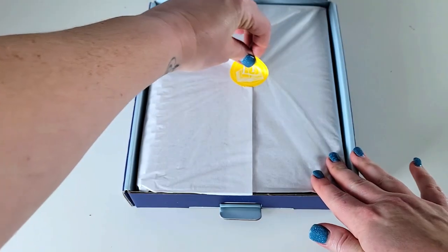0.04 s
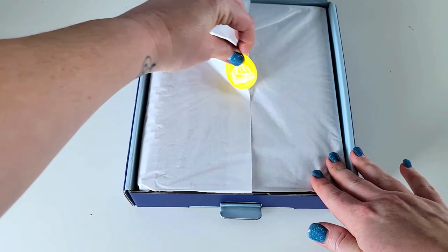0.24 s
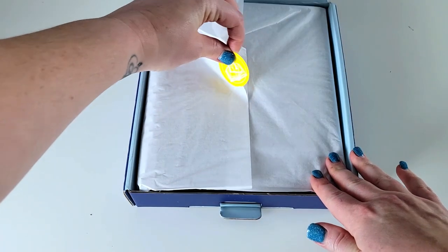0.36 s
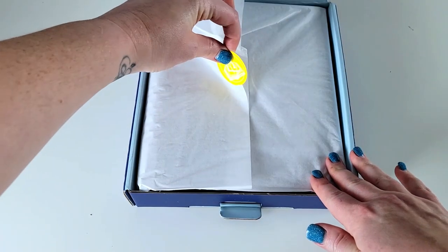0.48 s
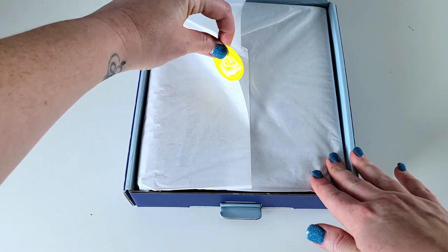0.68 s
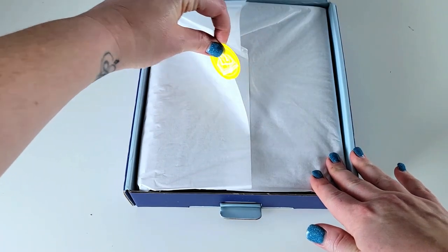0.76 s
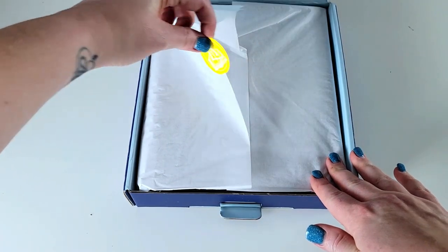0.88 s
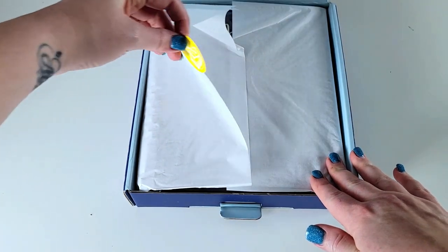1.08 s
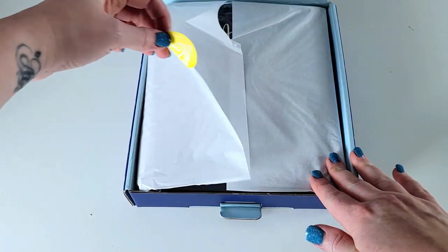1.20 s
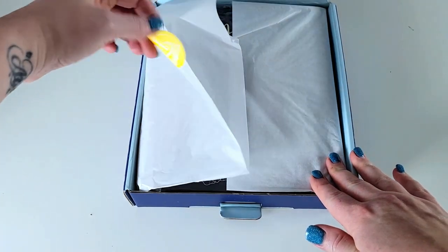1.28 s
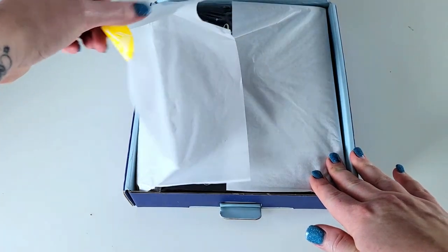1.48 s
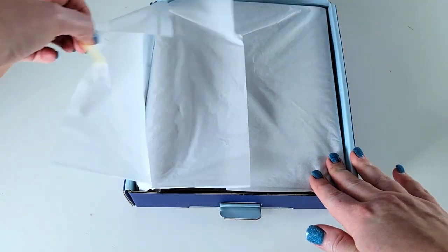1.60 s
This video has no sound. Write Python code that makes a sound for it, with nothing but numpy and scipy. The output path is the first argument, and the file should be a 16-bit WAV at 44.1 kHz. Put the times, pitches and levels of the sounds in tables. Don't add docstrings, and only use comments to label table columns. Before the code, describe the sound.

Close, dry crinkling of thin tissue paper in a cardboard box: light ticks, a sudden sticker rip at a third of a second, sparse faint snaps, then flurries of creases and a fluttering lift in a quiet room.

```python
import sys
import numpy as np
from scipy import signal
from scipy.fft import rfft, irfft, next_fast_len
from scipy.io import wavfile
from scipy.ndimage import uniform_filter1d

SR = 44100
rng = np.random.default_rng(int(sys.argv[2]) if len(sys.argv) > 2 else 0)


def materialize(psi):
    bounded = np.clip(np.atleast_2d(psi).T, -1, 1)
    quanta = np.round(bounded * 32767).astype(np.int16)
    wavfile.write(sys.argv[1], SR, quanta)


def ratio(d):
    e = np.asarray(d, float) / 20
    return 10 ** e


N = 72765

# (time [s], peak [dB], patch [Hz], treble
# share [dB])
STICKER_JERKS = [(0.2325, -30, 3760, 14.5), (0.291, -29, 3850, -11), (0.3058, -39, 3700, -19),
                 (0.3129, -23, 825, -40), (0.312, -20, 3960, -6), (0.3147, -33, 1200, -29),
                 (0.329, -22, 775, 0.5), (0.329, -22.5, 2920, -10), (0.3341, -25.5, 5650, -16),
                 (0.3441, -31.5, 1130, -20), (0.3351, -26.5, 1000, -25), (0.362, -38, 930, -22),
                 (.3122, -25.5, 1650, -7), (.3292, -23, 1880, -8), (1.3065, -41.5, 730, -20),
                 (1.4315, -41, 760, -20)]
# (time [s], peak [dB], patch [Hz], treble
# share [dB])
SINGLE_SNAPS = [(0.0386, -42.5, 3660, 5), (0.0504, -35, 6000, 8), (0.0881, -63, 2840, -22),
                (0.1003, -49, 3540, -15), (0.12, -43, 3080, -9), (0.1227, -42.5, 3070, -17.5),
                (0.1393, -44, 3730, -3), (0.1727, -42, 2830, 2), (0.209, -41.5, 3900, -1),
                (0.3854, -33.5, 2830, 4), (0.4299, -34, 2750, -1), (0.4347, -35, 1430, -15),
                (0.4445, -40.8, 6800, 6), (0.4822, -41.5, 2600, -3), (0.5034, -43, 2930, 3),
                (0.5093, -40.5, 2900, 4.5), (0.5345, -48, 2885, -13), (0.565, -48, 2780, 2),
                (0.57, -54, 3014, 2), (0.5872, -43.5, 8400, 4), (0.59, -40, 2650, 7),
                (0.6387, -43.5, 6850, 6), (0.6582, -45, 2700, 6), (0.67, -54, 6200, 12),
                (0.6982, -41.5, 2680, -7), (0.7287, -38.5, 5100, 8), (0.7837, -50, 2570, -11.5),
                (0.7918, -45, 5030, -19),
                (0.809, -48, 4005, -7), (0.8134, -40, 6500, -6), (0.8239, -39.5, 3720, 7),
              (0.852, -33.5, 4000, 0), (0.878, -51, 2600, -16), (0.8878, -39, 3700, -14),
              (0.8978, -34.5, 4800, 7), (0.9259, -33.5, 3670, 5), (0.9344, -42, 4950, -7),
              (0.9701, -35.5, 12700, 3), (0.981, -36.5, 4100, 7), (0.9997, -40, 2780, -18),
              (1.0186, -36, 6900, 3), (1.038, -58, 7019, -9), (1.039, -39, 2920, -33),
              (1.055, -38, 3960, -6), (1.0675, -29, 3440, 7), (1.0811, -30, 3900, 8),
              (1.1021, -35.5, 5700, 5), (1.137, -47, 3570, -13), (1.1568, -40, 1770, -18),
              (1.2005, -54, 990, -1), (1.223, -42, 3020, 4), (1.2527, -40.5, 6200, 0),
              (1.307, -32.5, 3250, -11), (1.3611, -34, 1550, 2), (1.378, -29, 9600, 20),
              (1.5505, -35.5, 8350, 17), (1.571, -39, 3150, -17), (1.633, -39, 4651, 7),
                (1.299, -35, 3300, 1),
    (1.39, -34.5, 8050, 12),
    (1.41, -43, 8400, -6),
    (1.422, -37, 8240, -2),
    (1.429, -39, 11100, 6),
                (.0064, -47, 3550, -17), (0.011, -45, 5500, -2), (0.0247, -47, 5080, 7),
               (.0385, -43, 1600, -8), (0.051, -44, 1330, -22), (0.0744, -51, 2970, -10),
               (.1877, -47, 3620, -4), (0.205, -39, 3870, -8), (.2535, -46, 3790, -8),
               (.2743, -43, 3830, -6), (0.3971, -38, 2860, -2), (0.46, -48, 2710, 15),
               (0.4797, -47, 2640, -10), (.5462, -50, 5990, -6), (0.578, -48, 1260, -2),
               (.6075, -50, 2840, 7), (0.6285, -46.5, 2580, -1), (0.7104, -49, 2480, 3),
               (0.744, -47, 1770, 1), (0.836, -49, 3920, -2), (0.8444, -41.5, 3950, -6),
               (0.8481, -38, 1930, 6), (.8877, -45.5, 1920, -19), (0.902, -44, 2800, -2),
               (.926, -37, 1900, -14), (1.0067, -41.5, 1200, -8), (1.167, -50, 3270, -1),
               (1.1845, -48, 2780, -10), (1.233, -53, 8440, 3), (1.3153, -33.5, 2900, -23),
               (1.3462, -44, 8500, 0), (1.3875, -37.5, 1880, -9), (1.4456, -39.5, 1620, -21),
               (1.4693, -38, 12000, 3), (1.475, -52, 1800, -2), (1.5157, -42, 1470, 3),
               (1.5448, -40, 1470, 5), (1.5705, -39, 1560, -14), (1.5924, -37, 8500, 5),
               (1.62, -44, 4300, -7), (1.648, -37.5, 7000, 7)]
# (time [s], rustle [dB], slack, i.e. whole-sheet flap [dB], crispness [dB])
SHEET_MOTION = [(0, -49, 4.5, -2), (0.148, -51.5, 3, 0), (.24, -45, 7.5, -6), (.3, -38.5, 8.5, 0.5),
                (0.329, -37, 19.5, 1.5), (0.385, -46, 2, -6.5), (.48, -57.5, -5, 1), (.56, -58, -0.5, 2.5),
                (0.743, -54.5, 0.5, -0.5), (0.777, -65.5, -22, -3), (.83, -53, 3.5, 2.5),
                (.96, -52, 3.5, -1), (1.04, -50.5, 6.5, 2), (1.13, -56, 4.5, 4), (1.278, -57.5, 4, -2.5),
                (1.343, -46, 6, 1.5), (1.42, -47, 10.5, 6), (1.65, -48, 3.5, 0.5)]
# (start [s], hold [s], boost [dB])
FOLD_FLURRIES = [(0.425, 0.0098, 6), (0.495, 0.011, 6), (0.572, 0.011, 5.5), (0.826, 0.0046, -3),
                 (1.005, 0.008, 10.5), (1.05, 0.039, 7.5), (1.146, 0.017, 9.5), (1.291, 0.018, 14.5),
                 (1.365, 0.027, 5.5), (1.459, 0.015, 5.5), (1.503, 0.018, 2), (1.583, 0.0083, 1)]
# (frequency [Hz], level [dB per Hz])
PAPER_SPECTRUM = [(90, -36), (200, -23), (330, -10), (480, -13), (800, -4.5), (2200, -4.5), (3700, -3.5),
                  (16000, -9.5)]
# (frequency [Hz], width [Hz], level [dB])
BOX_MODES = [(328, 25, 6.5), (745, 190, -4), (1145, 64, 0.5)]
# (frequency [Hz], level [dB per Hz])
AIR_SPECTRUM = [(20, -15), (65, -5.5), (150, -12), (600, -11.5), (16000, -62)]

AIR_DB = -75.5
GRAINS, GRAIN_SPREAD_DB, CLUSTER_DB = 2600, 2, 1.7
GRAIN_RISE_S, GRAIN_FALL_S, GRAIN_Q, GRAIN_RING_DB = 0.00032, 0.0017, 2.24, 5.5
FLAP_HZ, FLAP_DB, FLAP_FLUTTER_DB, FLAP_FOLLOWS = 810, -17, 5.5, 0.67
RAISED_S, RAISED_HZ = 1.29, 444
GAP_HZ, GAP_WIDTH_HZ, GAP_DB, GAP_OPENS_S = 2750, 350, 3.5, 0.95
STICKER_HZ, STICKER_WIDTH_HZ, STICKER_DB, STICKER_FREE_S = 3770, 250, 5.5, 0.35
ROOM_T60_S, ROOM_TOP_HZ, ROOM_DB = 0.065, 6500, -9.5
SNAP_RISE_S, SNAP_FALL_S, SNAP_Q, SNAP_RING_DB, SNAP_DB = 0.001, 0.0014, 5, 9, 1
SNAP_LOW_HZ, CLICK_HZ = 1000, 5000
TEAR_RISE_S, TEAR_FALL_S, TEAR_Q, TEAR_RING_DB, TEAR_DB = 0.0016, 0.0021, 4.5, 14, -1.5
BOX_DB, THUMP_DB = 2, -53
FLURRY_RISE_S, FLURRY_FALL_S = 0.0025, 0.024
ALIKE, LAG_S, LAG_SPREAD_S, RIGHT_DB = 0.26, 0.00008, 0.00004, 0.63
MIC_TOP_HZ = 16000
SIZE = 1024
F = np.arange(SIZE // 2 + 1) * SR / SIZE + 1e-3
T = np.arange(N) / SR


def curve(table, f):
    hz, db = np.array(table).T
    return ratio(np.interp(np.log(f), np.log(hz), db))


def colour(x, gain):
    n = next_fast_len(N)
    f = np.arange(n // 2 + 1) * SR / n + 1e-3
    return irfft(rfft(x, n) * gain(f), n)[..., :N]


def ring(f, hz, q):
    return 1 / (1 + 1j * q * (f / hz - hz / f))


def unit(x):
    return x / np.sqrt(np.mean(x ** 2))


def walk(rate):
    k = int(SR / rate)
    held = np.repeat(rng.standard_normal(N // k + 1), k)
    return 0.85 * uniform_filter1d(held, k)[:N]


def crease_body():
    return curve(PAPER_SPECTRUM, F) / np.sqrt(1 + (SNAP_LOW_HZ / F) ** 4)


def snaps(at, db, hz, treble_db, rise, fall, q, ring_db, body, click):
    count, start = len(at), SIZE // 4
    shared, left, right = rng.standard_normal((3, count, SIZE))
    t = (np.arange(SIZE) - start) / SR
    fall = fall * ratio(0.5 * rng.standard_normal((count, 1)))
    env = np.exp(-np.where(t < 0, (t / rise) ** 2, t / fall))
    same = np.sqrt(ALIKE + (1 - ALIKE) / (1 + (F / 150) ** 2))
    own = np.sqrt(1 - same ** 2)
    common = same * rfft(shared * env)
    spec = np.array([common + own * rfft(noise * env) for noise in (left, right)])
    energy = np.sum(env ** 2, axis=1, keepdims=True)
    onset = np.exp(-2j * np.pi * F * start / SR) / (1 + 1j * F / CLICK_HZ)
    spec += click * np.sqrt(energy) * onset
    shelf = ratio(treble_db[:, None] / (1 + (5000 / F) ** 2))
    spec = spec * body * (shelf + ratio(ring_db) * ring(F, hz[:, None], q))
    lag = LAG_S + LAG_SPREAD_S * rng.standard_normal((count, 1))
    spec[1] *= np.exp(-2j * np.pi * F * lag)
    pair = irfft(spec, SIZE)
    rms = np.sqrt(np.mean(pair ** 2, axis=(0, 2)) / np.mean(env ** 2, axis=1))
    pair *= (ratio(db) / rms)[:, None]
    out = np.zeros((2, N + 2 * SIZE))
    place = (at * SR).astype(int)[:, None] + np.arange(SIZE)
    for ch in range(2):
        np.add.at(out[ch], place, pair[ch])
    return out[:, start:start + N]


def room_air():
    mid, side = rng.standard_normal((2, N))
    side = colour(side, lambda f: 0.66 + 0.27 / (1 + (500 / f) ** 2))
    pair = mid + side * np.array([[1], [-1]])
    return ratio(AIR_DB) * unit(colour(pair, lambda f: curve(AIR_SPECTRUM, f)))


def tiny_snaps():
    when, strength, pitch, tilt = rng.random((4, GRAINS))
    at = when * N / SR
    at[:10] *= 0.003
    db = -GRAIN_SPREAD_DB * np.log(strength + 0.03)
    db += CLUSTER_DB * walk(69.74)[(at * SR).astype(int)]
    hz = 900 * 9 ** pitch
    return unit(snaps(at, db, hz, 6 * (tilt - 0.5), GRAIN_RISE_S, GRAIN_FALL_S,
                      GRAIN_Q, GRAIN_RING_DB, crease_body(), 0))


def sheet_flap():
    mid, side = rng.standard_normal((2, N))
    pair = mid + 0.86 * side * np.array([[1], [-1]])
    flap = colour(pair, lambda f: curve(PAPER_SPECTRUM, f) / (1 + (f / FLAP_HZ) ** 4))
    deep = colour(flap, lambda f: 1 / (1 + (f / RAISED_HZ) ** 6))
    flap = unit(flap - 0.69 * deep * (T > RAISED_S))
    return flap * ratio(FLAP_DB + FLAP_FLUTTER_DB * walk(60))


def sheet_rustle():
    grains = tiny_snaps()
    high = colour(grains, lambda f: 1 / (1 + (5500 / f) ** 4))
    times, *motions = np.array(SHEET_MOTION).T
    level, slack, crisp = (ratio(np.interp(T, times, db)) for db in motions)
    burst = flurry_gain()
    crackle = burst * (grains + (crisp - 1) * high)
    return level * (crackle + burst ** FLAP_FOLLOWS * slack * sheet_flap())


def resonance(x, hz, width_hz, db, until):
    fade = 1 / (1 + np.exp((T - until) / 0.0062))
    return (ratio(db) - 1) * fade * colour(x, lambda f: ring(f, hz, hz / width_hz))


def room_echo(paper):
    t = np.arange(SR // 4) / SR
    diffuse = rng.standard_normal((2, len(t))) + 0.48 * rng.standard_normal(len(t))
    echo = diffuse * ratio(-60 * t / ROOM_T60_S) * (t > 0.002)
    echo = ratio(ROOM_DB) * echo / np.sqrt(np.sum(echo ** 2, axis=1, keepdims=True))
    wet = signal.fftconvolve(paper, echo, axes=1)[:, :N]
    return colour(wet, lambda f: 1 / (1 + 1j * f / ROOM_TOP_HZ))


def crease_snaps():
    at, db, hz, treble = np.array(SINGLE_SNAPS).T
    return snaps(at, db + SNAP_DB, hz, treble + 4, SNAP_RISE_S, SNAP_FALL_S,
                 SNAP_Q, SNAP_RING_DB, crease_body(), 0.57)


def sticker_tear():
    at, db, hz, treble = np.array(STICKER_JERKS).T
    modes = sum(ratio(d) * ring(F, f, f / width) for f, width, d in BOX_MODES)
    box = 1 + ratio(BOX_DB) * np.abs(modes)
    body = box * F ** 2 / (F ** 2 + 250 ** 2) / np.sqrt(1 + (F / 3500) ** 2)
    return snaps(at, db + TEAR_DB, hz, treble + 8, TEAR_RISE_S, TEAR_FALL_S,
                 TEAR_Q, TEAR_RING_DB, body, 0.85)


def box_thump():
    t = T - 0.333
    push = np.exp(-np.where(t < 0, t / 0.023, t / 0.032) ** 2)
    thump = colour(rng.standard_normal(N), lambda f: ring(f, 138, 0.83))
    return ratio(THUMP_DB) * push * unit(thump)


def flurry_gain():
    db = np.zeros(N)
    for start, hold, boost_db in FOLD_FLURRIES:
        corners = np.cumsum([start, FLURRY_RISE_S, hold, FLURRY_FALL_S])
        db += np.interp(T, corners, [0, boost_db, boost_db, 0])
    return ratio(db)


def scene():
    sheet = sheet_rustle() + crease_snaps()
    paper = sheet + sticker_tear() + box_thump()
    paper += resonance(sheet, GAP_HZ, GAP_WIDTH_HZ, GAP_DB, GAP_OPENS_S)
    paper += resonance(sheet, STICKER_HZ, STICKER_WIDTH_HZ, STICKER_DB, STICKER_FREE_S)
    return paper + room_echo(paper) + room_air()


def band_limit(x):
    return signal.sosfilt(signal.butter(12, 16970, fs=SR, output="sos"), x)


def record(dry):
    heard = colour(dry, lambda f: 0.02 + 0.98 / (1 + (f / MIC_TOP_HZ) ** 90))
    balance = ratio(np.array([[-RIGHT_DB], [RIGHT_DB]]) / 2)
    return band_limit(heard * balance)


dry = scene()
out = record(dry)
materialize(out)
```